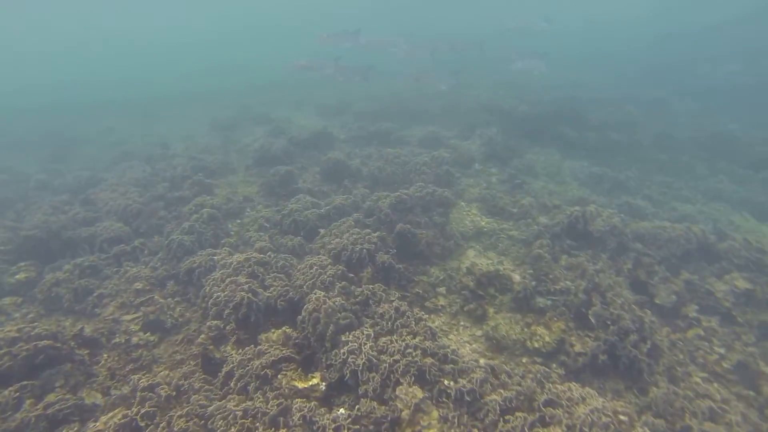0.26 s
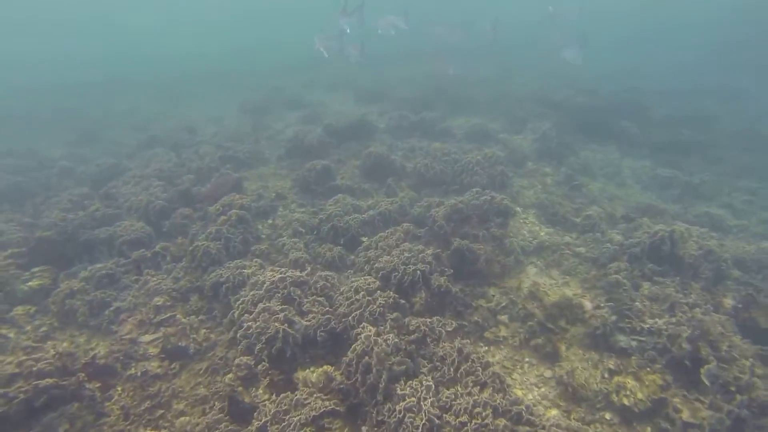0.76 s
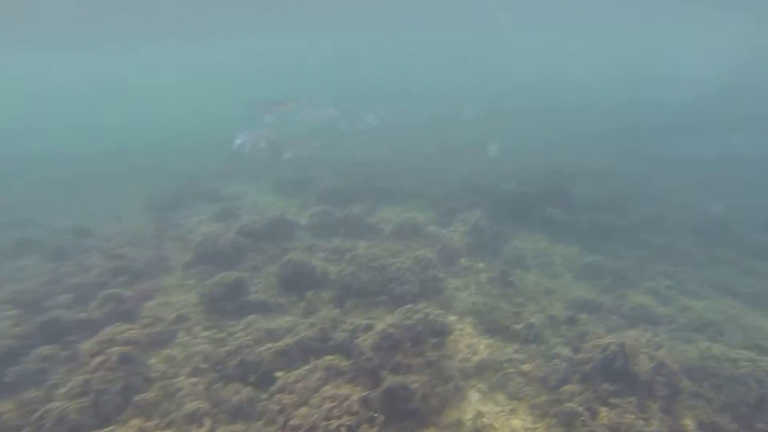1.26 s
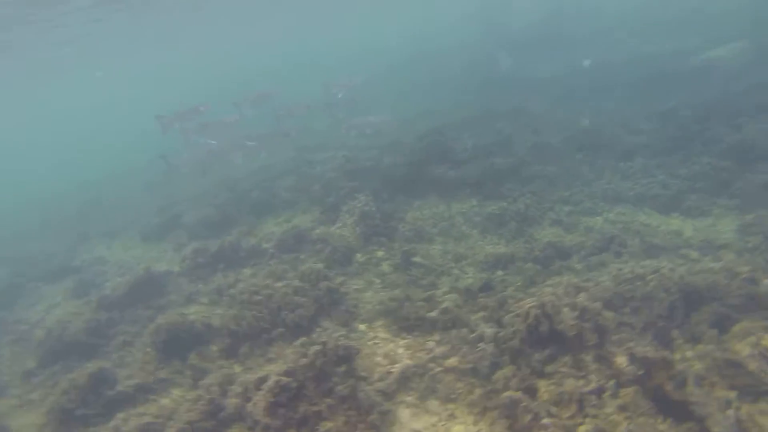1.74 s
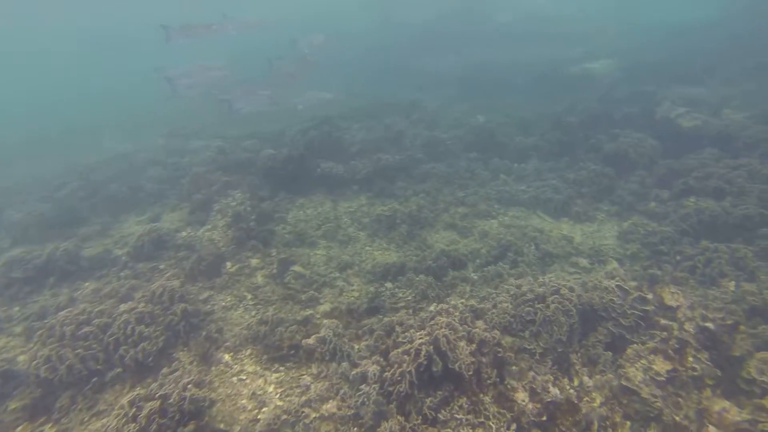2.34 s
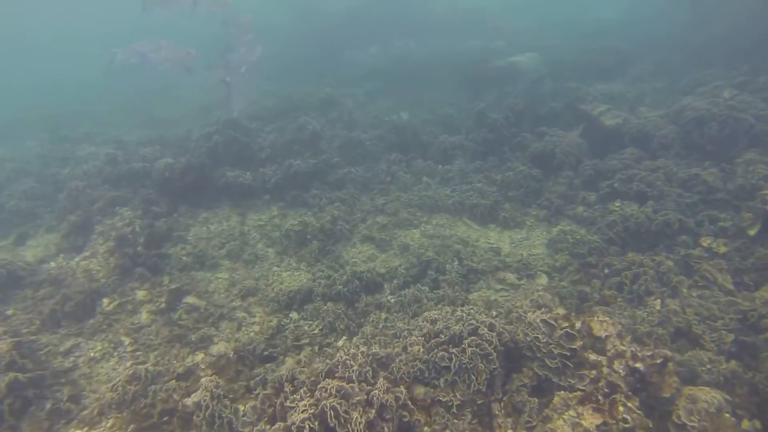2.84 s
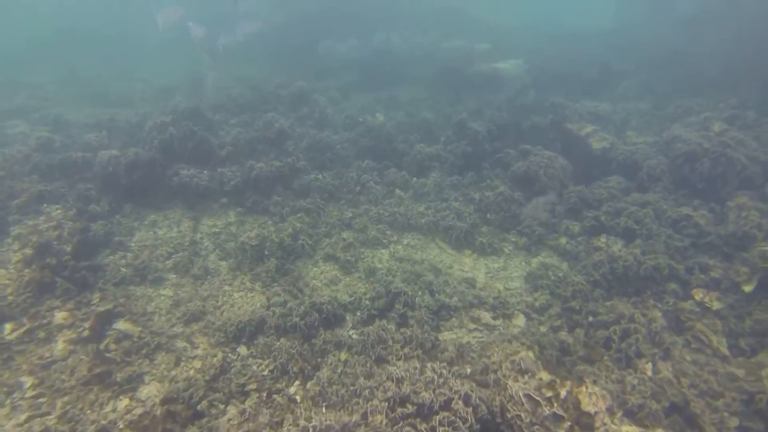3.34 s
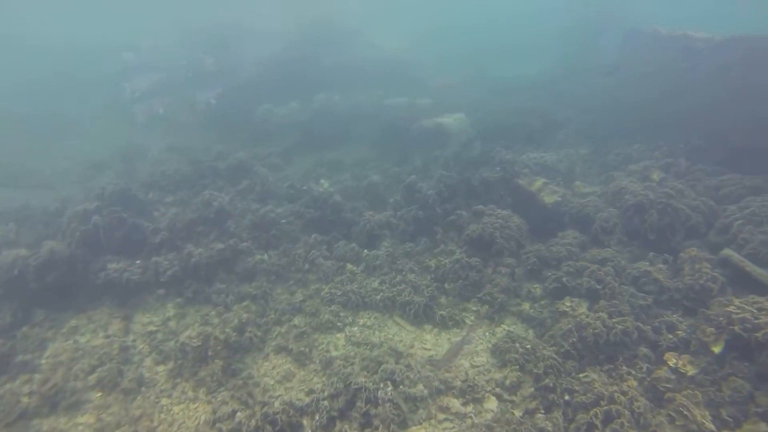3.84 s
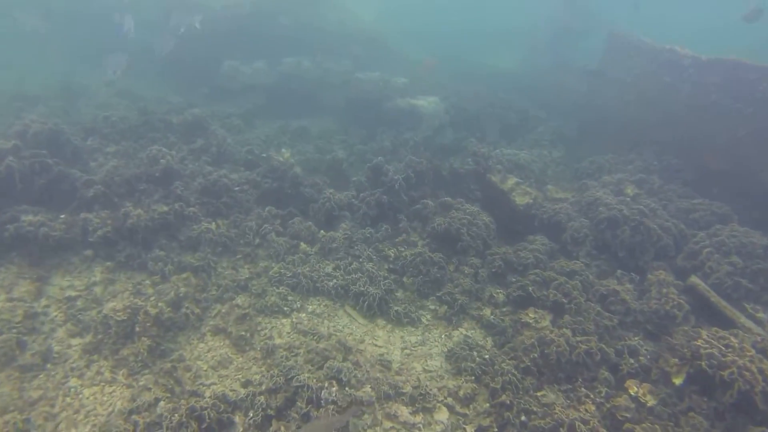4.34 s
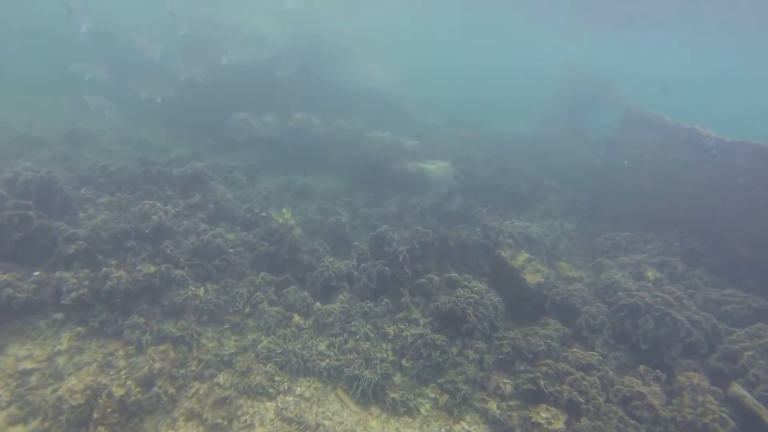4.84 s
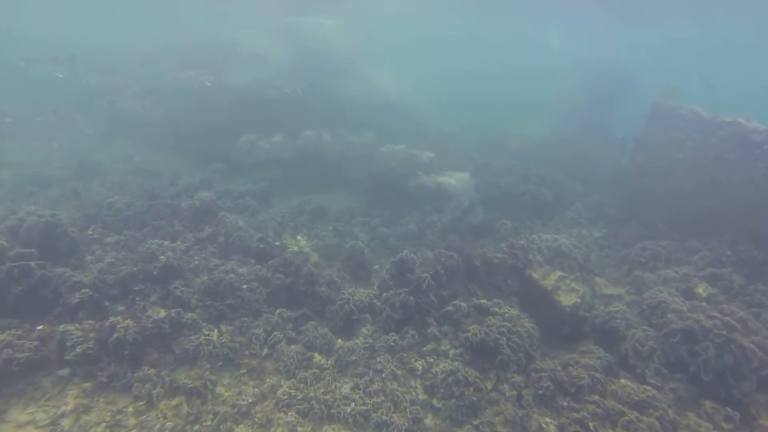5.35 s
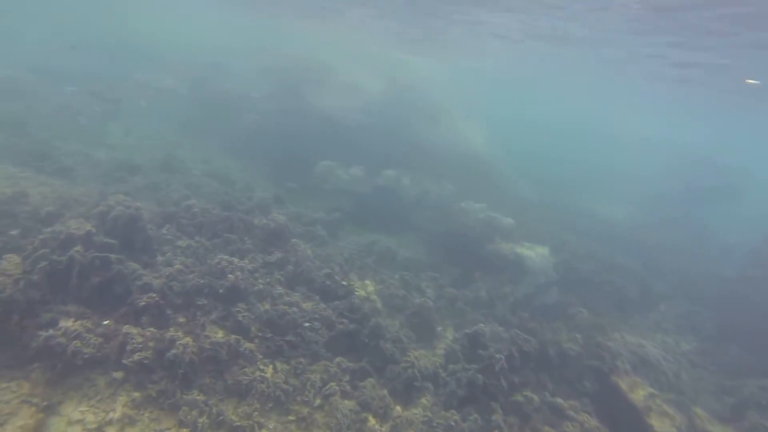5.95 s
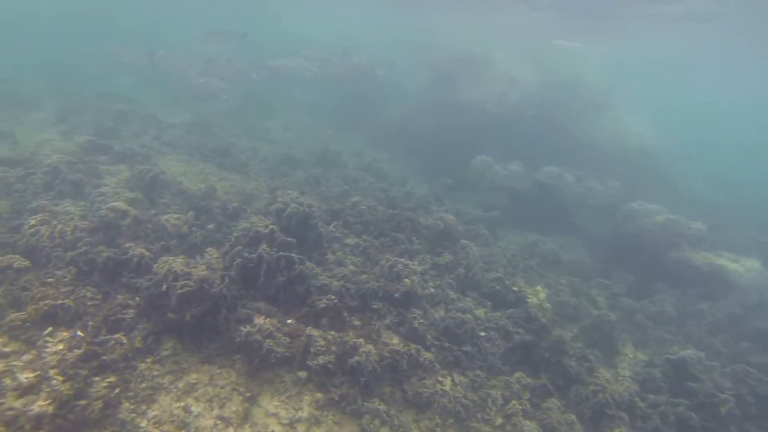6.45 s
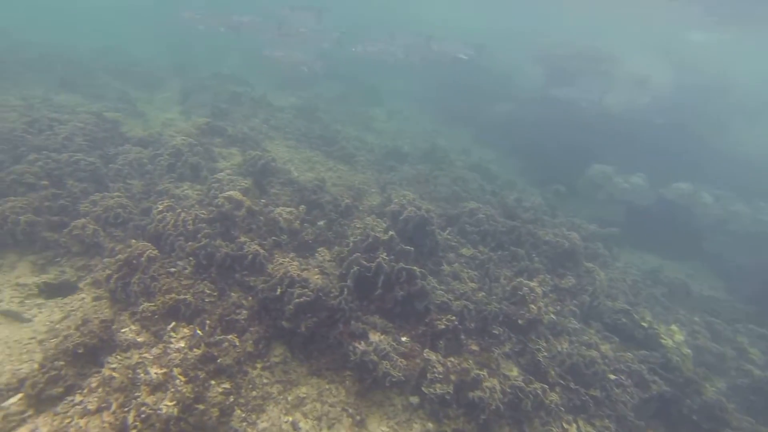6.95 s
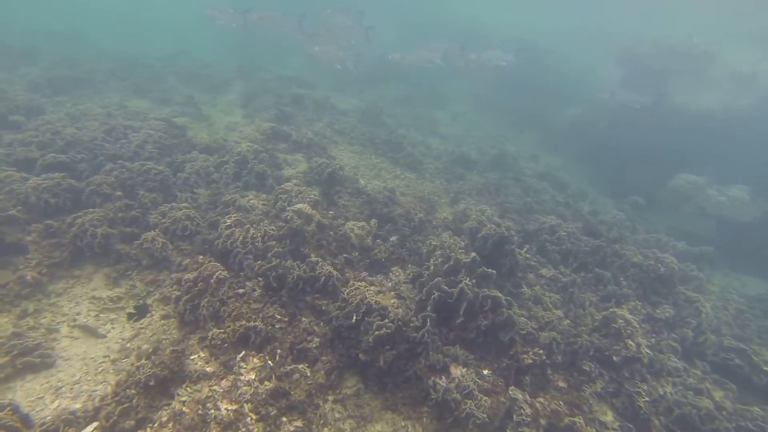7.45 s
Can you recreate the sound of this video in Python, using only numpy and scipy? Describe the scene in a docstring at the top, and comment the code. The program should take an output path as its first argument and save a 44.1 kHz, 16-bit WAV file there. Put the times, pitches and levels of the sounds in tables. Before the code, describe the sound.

Muffled underwater rumble and heavy thumping slaps against a camera housing, then gurgles and constant sharp shrimp snaps crackling over a shallow reef.

```python
"""Just under the surface of a shallow reef, heard by a camera inside a waterproof housing.
From the start: filtered noise for swell and streaming water, and random clicks for the shrimp colony.
Slaps (splash noise and a thump), ringing snaps and foaming surges crowd the first two seconds.
Gurgles and lone bubbles (decaying sines) join in, then two wavering tones at about two seconds.
Slaps are rarer later, and snaps go on to the end; gain control ducks everything after heavy slaps."""
import sys
import numpy as np
from scipy import signal
from scipy.fft import rfft, irfft, next_fast_len
from scipy.io import wavfile
from scipy.ndimage import uniform_filter1d

SR = 44100
rng = np.random.default_rng(int(sys.argv[2]) if len(sys.argv) > 2 else 0)


def dump(signal):
    """Clip the signal to [-1, 1] and save it as 16-bit WAV at the path in sys.argv[1]."""
    limited = np.clip(np.atleast_2d(signal).T, -1, 1)
    pcm = np.round(limited * 32767).astype(np.int16)
    wavfile.write(sys.argv[1], SR, pcm)


N = 339570
TIME = np.arange(N) / SR  # seconds

# Levels in the tables are before the small trims that some functions add.
# Water heaving against the case: t/s, level/dB
SWELL_LEVEL = [(0, -17.5), (0.33, -19), (0.45, -19.5), (0.56, -14.5), (0.95, -17), (1.25, -19),
               (1.7, -13.5), (2.0, -23.5), (2.7, -26.5), (2.95, -16), (3.3, -25), (3.5, -18.5), (3.8, -28),
               (4.1, -26), (4.55, -40.5), (4.8, -19), (5.4, -27.5), (5.7, -23), (6.4, -28.5), (6.7, -24),
               (7.7, -30.5)]
# Water streaming past the case: t/s, level/dB
FLOW_LEVEL = [(0, -44.5), (0.7, -43.5), (1.7, -36), (1.95, -50), (2.2, -54), (2.62, -42.5), (2.9, -44),
              (3.3, -56.5), (3.55, -47), (4.25, -60), (4.85, -48), (5.35, -59.5), (5.75, -49), (6.9, -54),
              (7.7, -54)]
# Far shrimp, all together: t/s, level/dB
COLONY_LEVEL = [(0, -55), (.7, -57), (1.5, -56.5), (2.7, -54.5), (4.2, -55.5), (5.2, -57.5), (6.0, -58.5),
                (7.7, -57)]
# Wavelets hitting the case: t/s, thump level/dB, thump half width/s, splash level/dB
SLAP_EVENTS = [(0.002, -14, 0.0084, -32), (0.15, -14, 0.0071, -30.5), (0.283, 8.5, 0.0025, -35),
               (0.31, 8, 0.0058, -22.5), (0.348, 6.5, 0.005, -32), (0.565, -3.5, 0.0033, -40),
               (0.602, 7.5, 0.003, -18.5), (0.652, -0.5, 0.0063, -55), (0.7989, 0.5, 0.0029, -27),
               (1.098, -1.5, 0.0035, -41), (1.246, -2, 0.0053, -42.5), (1.391, -6.5, 0.0058, -55),
               (1.446, -10, 0.0044, -51), (1.595, 4.5, 0.0015, -26), (1.699, 3, 0.01, -23.5),
               (1.818, -1.5, 0.0058, -36.5), (2.932, -6, 0.006, -40.5), (3.464, -10, .0036, -47.5),
               (4.105, -10.5, 0.0077, -55), (4.806, -14, 0.01, -47), (5.685, -2, 0.0042, -39.5),
               (6.79, -14, 0.0057, -56)]
# The closest shrimp: t/s, knock level/dB, knock pitch f/Hz, crack level/dB
SNAP_EVENTS = [(0.0488, -30, 1830, -44), (0.0975, -41.5, 2430, -44), (0.1385, -41, 1700, -60),
               (0.1465, -29, 1770, -56), (0.2644, -47, 2200, -48), (0.381, -35.5, 3200, -41.5),
               (0.5318, -36, 2100, -41), (0.794, -36, 2660, -53), (1.0954, -46, 2300, -48.5),
               (1.2232, -40.5, 3070, -42.5), (1.302, -42, 2980, -44), (1.2695, -40, 2260, -52),
               (1.3845, -44.5, 3300, -50.5), (1.4463, -42.1, 2570, -51), (1.4862, -32.5, 1620, -53),
               (1.7074, -38, 2430, -43), (1.8362, -37.5, 2220, -56), (1.9644, -51, 2060, -60),
               (2.0923, -34, 1750, -42), (2.1146, -41, 2434, -58), (2.126, -38.5, 2080, -39),
               (2.543, -37.5, 2660, -52), (2.5593, -42, 2570, -46.5), (2.6042, -33.5, 2700, -46),
               (2.6214, -32, 2300, -47), (2.6657, -38, 2390, -57), (2.8533, -35, 1950, -41),
               (2.9093, -33.5, 1700, -45.5), (2.9922, -38.0, 1790, -45.5), (3.0203, -35, 2050, -60),
               (3.1276, -29.5, 2670, -33.5), (3.1783, -35.5, 2470, -47.5), (3.2624, -40.5, 2520, -64),
               (3.3059, -34, 1670, -68), (3.4608, -34.5, 2040, -53), (3.5681, -32.5, 1770, -49),
               (3.587, -36.9, 2440, -46), (3.7315, -36, 2170, -52.2), (3.7948, -60, 2830, -43),
               (3.9727, -38.5, 1760, -48), (4.0466, -32.5, 2320, -67), (4.1104, -39, 2340, -40.5),
               (4.1208, -36, 1530, -54), (4.2376, -37, 2160, -46), (4.2563, -32, 1560, -65.4),
               (4.3813, -33.5, 1970, -50.8), (4.4696, -37.5, 2120, -54), (4.7293, -16.5, 2000, -32.5),
               (5.1334, -39.7, 2700, -50), (5.2556, -42, 2590, -50), (5.2712, -38, 2210, -60),
               (5.4206, -32.5, 3100, -48), (5.6185, -41.5, 2500, -44), (5.8465, -36, 2760, -50),
               (6.77, -43.5, 2300, -62), (6.3483, -33.5, 1770, -63.5), (6.4018, -31, 2150, -39.5),
               (6.4924, -42.5, 2090, -38), (6.595, -31, 2120, -46), (6.6804, -32, 2530, -43.5),
               (6.957, -37, 2300, -56), (6.9649, -35, 2000, -54), (7.0075, -38, 2130, -52),
               (7.2918, -33, 2200, -38.5), (7.319, -40, 2720, -41), (7.3252, -36.5, 2620, -48),
               (7.3369, -33, 1970, -38), (7.3756, -9, 1710, -32.5), (7.495, -38, 2660, -53.5),
               (7.5959, -36.5, 2320, -51)]
# Broken water washing over the case: start t/s, end t/s, start level/dB, end level/dB
SURGE_EVENTS = [(0.121, 0.256, -46, -55), (0.254, 0.355, -36.5, -28), (0.53, 0.646, -43, -29),
                (1.355, 1.555, -56, -45), (0.791, 0.809, -22, -37.5), (1.562, 1.592, -38, -22.5),
                (1.614, 1.7, -33, -31.5), (2.896, 2.95, -43.5, -46.5), (3.42, 3.504, -48, -61)]
# Water pulling away from the case after some of the slaps: t/s, level/dB
PULL_EVENTS = [(0.578, -1), (0.624, 0), (0.818, 8), (1.607, 4.5), (1.713, 10), (5.704, -13)]
# Air pockets breaking up: t/s, level/dB, middle pitch f/Hz, time over which bubbles form/s
GURGLE_EVENTS = [(0.789, -31.5, 1440, 0.016), (1.561, -28, 737, 0.034), (2.133, -41, 600, 0.021),
                 (3.894, -41.5, 597, 0.03), (3.934, -40.5, 366, 0.046), (3.966, -36, 590, 0.015),
                 (4.338, -37, 555, 0.00795), (4.805, -44, 205, 0.043), (4.806, -51, 810, 0.054),
                 (4.901, -44, 400, 0.019), (6.371, -41, 546, 0.019), (7.655, -33, 572, 0.026)]
# Single bubbles: t/s, level/dB, starting pitch f/Hz
BLIP_EVENTS = [(1.542, -38, 590), (3.9, -22.5, 523), (3.991, -26, 206), (4.004, -37, 510),
               (4.278, -40, 462), (4.355, -28, 557), (4.818, -37, 1290), (4.847, -40, 880),
               (4.913, -22, 209), (4.996, -37, 546), (5.574, -40, 536), (5.58, -26, 213)]
# Lower faint tone in the streaming water: t/s, pitch f/Hz, level/dB
LOW_TONE_PATH = [(1.9, 555, -54), (1.97, 565, -51.5), (2.04, 595, -64), (2.18, 602, -52), (2.3, 628, -72),
                 (2.45, 595, -49.5), (2.62, 551, -62)]
# Higher faint tone in the streaming water: t/s, pitch f/Hz, level/dB
HIGH_TONE_PATH = [(2.2, 770, -67), (2.29, 780, -52.5), (2.39, 830, -59), (2.6, 745, -60)]
# Resonances of the housing: f/Hz, width/Hz, boost/dB
HOUSING_RESONANCES = [(565, 61, 6), (1290, 116, 23.5), (1554, 162, 12), (1850, 55, 3), (2260, 210, 8),
                      (2565, 114, 6), (3513, 430, 8.5), (5210, 170, 4.5), (6000, 880, 1.5), (8280, 250, 4),
                      (11400, 400, 4)]
# Spectrum of the swell: f/Hz, relative level/dB (per Hz)
SWELL_SPECTRUM = [(8, -9), (15, 4.5), (24, 8), (35, -4), (50, -10), (70, -16.5), (100, -45.5), (200, -85)]
# Spectrum of the streaming water: f/Hz, relative level/dB (per Hz)
FLOW_SPECTRUM = [(45, -18.5), (75, 5), (120, -1), (160, -6), (210, -6), (290, -10.5), (420, -16.5),
                 (600, -19.5), (1000, -26.5), (3000, -69.5)]
# Spectrum shaping the far shrimp: f/Hz, relative level/dB (per Hz)
COLONY_SPECTRUM = [(250, -5.5), (500, 12), (800, 2), (1050, -10), (1400, -17), (2300, -0.5), (3500, -3),
                   (4500, -8), (7000, -3.5), (9000, -10.5), (12000, -8), (16000, -34)]
# Spectrum of splashes and fizz: f/Hz, relative level/dB (per Hz)
SPLASH_SPECTRUM = [(120, 5), (195, 14), (330, 3), (600, 1.5), (900, -3.5), (1500, -11), (2400, -19),
                   (5000, -30.5), (14000, -59)]
# Spectrum shaping the crack of a snap: f/Hz, relative level/dB (per Hz)
CRACK_SPECTRUM = [(2500, -41.5), (4000, 0.5), (5500, 5), (7500, 2), (10000, -5), (13000, -6), (16000, -19)]
# Spectrum of the surge froth: f/Hz, relative level/dB (per Hz)
SURGE_SPECTRUM = [(150, -30.5), (300, 6), (650, -1), (1000, 3), (1500, -9), (2200, -21), (4000, -23),
                  (12000, -58.5)]


def from_db(db):
    """Turn decibels into a plain multiplier."""
    return 10 ** (np.asarray(db) / 20)


def rms_one(x):
    """Scale a sound to an average strength (RMS) of 1."""
    return x / np.sqrt(np.mean(x ** 2) + 1e-20)


def level(curve):
    """Gain at every sample from rows of (s, dB)."""
    return from_db(np.interp(TIME, *np.transpose(curve)))


def add(out, s, sound):
    """Mix a sound in, starting at s seconds."""
    at = int(np.clip(round(s * SR), 0, N - 1))
    out[at:at + len(sound)] += sound[:N - at]


def bell(x):
    """Bell-shaped bump with height 1 at x = 0."""
    return np.exp(-.5 * np.minimum(x ** 2, 100))


def random_clicks(per_s):
    """True at the samples where a click falls by chance."""
    return rng.random(N) < per_s / SR


def colour(x, spectrum):
    """Filter with the given spectrum that never sounds ahead of its input (minimum phase)."""
    size = 2 * next_fast_len(len(x))
    hz, db = np.transpose(spectrum)
    bins = np.maximum(np.arange(size // 2 + 1) * SR / size, 1)
    gain = from_db(np.interp(np.log(bins), np.log(hz), db))
    # Folding the cepstrum forward in time gives the minimum-phase response.
    cepstrum = irfft(np.log(gain))
    cepstrum[1:size // 2] *= 2
    cepstrum[size // 2 + 1:] = 0
    return irfft(rfft(x, size) * np.exp(rfft(cepstrum)))[:len(x)]


def drift(rate):
    """Random wandering with about `rate` new values a second, joined by straight lines; RMS 1."""
    knots = rng.standard_normal(int(N / SR * rate) + 2)
    return rms_one(np.interp(TIME * rate, np.arange(len(knots)), knots))


def resonance(x, hz, width_hz):
    """Something that rings at one pitch: a two-pole band-pass with gain 1 on top."""
    r = np.exp(-np.pi * width_hz / SR)
    feed = np.array([1, 0, -1]) * (1 - r * r) / 2
    ring = [1, -2 * r * np.cos(2 * np.pi * hz / SR), r * r]
    return signal.lfilter(feed, ring, x + 1e-18)


def double_resonance(x, hz, width_hz):
    """The same resonance twice in a row, for a tighter band."""
    return resonance(resonance(x, hz, width_hz), hz, width_hz)


def housing(x):
    """Each resonance of the case lifts its own band and rings on."""
    for hz, width_hz, boost_db in HOUSING_RESONANCES:
        x = x + (from_db(boost_db) - 1) * resonance(x, hz, width_hz)
    return x


def snap_paths(scatter_db, scatter_t60, tail_db, tail_t60, echo=0.33, echo_gap_s=0.0015,
               echo_loss=0.73, build_s=0.00013, count=3, size=2600):
    """One bubble collapse: direct pulse, early echoes of changing sign, scatter off the coral."""
    t = np.arange(size) / SR
    # Each t60 is the time in seconds to fall by 60 dB.
    decay = from_db(scatter_db - 60 * t / scatter_t60) + from_db(tail_db - 60 * t / tail_t60)
    pulse = rng.standard_normal(size) * decay * (1 - np.exp(-t / build_s))
    pulse[0] += 1
    delays = np.cumsum(echo_gap_s * (.5 + rng.random(count)))
    pulse[(delays * SR).astype(int)] -= echo * (-echo_loss) ** np.arange(count)
    return pulse


def moving_water(swell_db=1.54, flow_db=1.0, eddy_db=3.0, evenness=0.052):
    """Slow pressure swings of the swell, and the rush of eddies shed by the case."""
    heave = colour(rng.standard_normal(N), SWELL_SPECTRUM)
    strength = uniform_filter1d(np.abs(signal.hilbert(heave)), int(.08 * SR))
    heave = rms_one(heave / strength ** evenness)  # evens out the swings a little
    rush = rms_one(colour(rng.standard_normal(N), FLOW_SPECTRUM)) * from_db(eddy_db * drift(30))
    swell = from_db(swell_db) * level(SWELL_LEVEL) * heave
    return swell + from_db(flow_db) * level(FLOW_LEVEL) * rush


def far_shrimp(per_s=300, spread_db=5.5, crackle_db=3.5, wash_db=-0.5, route_width=0.37, count=24):
    """Many weak snaps of uneven size; the farthest merge into a smooth sizzle."""
    sizes = from_db(spread_db * np.minimum(rng.exponential(1, N), 3.2))
    clicks = random_clicks(per_s) * sizes * rng.choice([-1, 1], N)
    route = rng.integers(0, count, N)
    crackle = np.zeros(N)
    # Each route over the coral favours a band of its own.
    for k, hz in enumerate(np.geomspace(1300, 5000, count)):
        paths = snap_paths(scatter_db=-5.0, scatter_t60=0.0092, tail_db=-24.5, tail_t60=0.031)
        path = resonance(paths, hz, route_width * hz)
        crackle += signal.oaconvolve(clicks * (route == k), rms_one(path))[:N]
    reef = rms_one(crackle) + from_db(wash_db) * rng.standard_normal(N)
    sizzle = rms_one(colour(housing(reef), COLONY_SPECTRUM))
    return from_db(crackle_db) * level(COLONY_LEVEL) * sizzle


def small_shrimp(per_s=70, tick_db=-35, spread_db=8.0, width=0.51, fade_db=1.5, count=7):
    """Tiny shrimp close by give only thin ticks, dealt out over several pitches."""
    sizes = from_db(tick_db + spread_db * np.clip(rng.standard_normal(N), -2, 2))
    clicks = random_clicks(per_s) * sizes
    dealt = rng.integers(0, count, N)
    ticks = np.zeros(N)
    for k, hz in enumerate(np.geomspace(3200, 11000, count)):
        path = snap_paths(scatter_db=-11.5, scatter_t60=0.016, tail_db=-60, tail_t60=.03)
        tick = double_resonance(path, hz, width * hz)
        # Higher ticks are fainter.
        ticks += from_db(-fade_db * k) * signal.oaconvolve(clicks * (dealt == k), tick)[:N]
    return ticks * rms_one(level(COLONY_LEVEL))  # they rise and fall with the colony


def froth(spectrum, gain_db):
    """The lumpy, sputtering rush of torn water: noise whose strength flickers."""
    sputter = from_db(5 * drift(330))
    return from_db(gain_db) * rms_one(colour(rng.standard_normal(N) * sputter, spectrum))


def case_boom(thumps, boom_hz=185, boom_width_hz=70, boom_db=0,
              rebound_hz=42, rebound_width_hz=28, rebound_db=-4):
    """A slap rocks the whole case, which swings back and booms briefly."""
    rebound = from_db(rebound_db) * resonance(thumps, rebound_hz, rebound_width_hz)
    boom = from_db(boom_db) * resonance(thumps, boom_hz, boom_width_hz)
    return thumps + rebound + boom


def slaps(rise_s=0.0056, fall_s=0.015, lead_s=0.0083, foam_db=-16, foam_s=0.041, suction_widths=3.3):
    """A splash swells up, then water closes on the case: a pressure peak flanked by suction."""
    thumps, splash = np.zeros(N), np.zeros(N)
    for s, db, width, splash_db in SLAP_EVENTS:
        near = slice(*np.searchsorted(TIME, [s - .2, s + .2]))
        t = TIME[near] - s
        peak = 1 / (1 + (t / width) ** 2)
        peak -= peak.min()
        suction = bell(t / (suction_widths * width) - .7)
        # The suction cancels the total push of the peak.
        thumps[near] += from_db(db) * (peak - suction * peak.sum() / suction.sum())
        early = t + lead_s  # the splash is strongest just before the thump
        swelling = bell(early / np.where(early < 0, rise_s, fall_s))
        foam = from_db(foam_db) * np.exp(-np.abs(t) / foam_s)
        splash[near] += from_db(splash_db) * (swelling + foam)
    return case_boom(thumps) + splash * froth(SPLASH_SPECTRUM, gain_db=3.5)


def neighbours(per_s=42, top_db=-41.5, range_db=15, flurry_db=3.5, middle_hz=2300,
               spread_octaves=0.5, crack_db=-11, crack_spread_db=8):
    """Random snaps a little farther off, in flurries, more often where the colony is loud."""
    chance, place, pitch, edge = rng.random((int(per_s * N / SR), 4)).T
    activity = np.cumsum((level(COLONY_LEVEL) * from_db(flurry_db * drift(18))) ** 2)
    s = np.interp(chance, activity / activity[-1], TIME)
    db = top_db - range_db * np.sqrt(place)  # most are far off and weak
    hz = middle_hz * 2 ** (spread_octaves * (2 * pitch - 1))
    crack = db + crack_db + crack_spread_db * (2 * edge - 1)
    return np.transpose([s, db, hz, crack])  # same columns as SNAP_EVENTS


def at_level(snap, db):
    """Scale a snap to a level over its first 8 ms."""
    head = snap[:int(.008 * SR)]
    return snap * from_db(db) / np.sqrt(np.mean(head ** 2))


def near_shrimp(knock_width_hz=1450, crack_trim_db=-4.5, thud_hz=760, thud_width_hz=700,
                thud_db=-1.0, thud_growth=1.215, scatter_db=-21.0, clearing=0.1):
    """A snap knocks the housing with a thin crack on top; closer ones thud more, scatter less."""
    out = np.zeros(N)
    for s, db, hz, crack_db in [*SNAP_EVENTS, *neighbours()]:
        scatter = scatter_db - clearing * db + rng.normal(0, 2.8)
        pulse = housing(snap_paths(scatter, scatter_t60=0.019, tail_db=-39, tail_t60=0.017))
        knock = double_resonance(pulse, hz, knock_width_hz)
        thud = double_resonance(pulse, thud_hz, thud_width_hz)
        sharp = snap_paths(scatter_db=-9.5, scatter_t60=0.0063, tail_db=-56, tail_t60=0.15)
        crack = colour(housing(sharp), CRACK_SPECTRUM)
        snap = at_level(knock, db)
        snap += at_level(thud, thud_growth * db + thud_db)
        snap += at_level(crack, crack_db + crack_trim_db)
        add(out, s, snap)
    return out


def surges(attack_s=0.0025, release_s=0.0053, bubbles_per_s=260, bubble_db=-2,
           bubble_width=0.05, count=22):
    """Broken water sets in quickly and washes on: froth full of small ringing bubbles."""
    flow = np.zeros(N)
    for start, end, start_db, end_db in SURGE_EVENTS:
        fade_in = np.clip((TIME - start) / attack_s, 0, 1)
        fade_out = np.exp(-np.clip((TIME - end) / release_s, 0, 20))
        flow += fade_in * fade_out * level([(start, start_db), (end, end_db)])
    births = random_clicks(bubbles_per_s) * rng.standard_normal(N)
    dealt = rng.integers(0, count, N)
    bubbles = np.zeros(N)
    for k, hz in enumerate(np.geomspace(500, 1900, count)):
        bubbles += resonance(births * (dealt == k), hz, bubble_width * hz) / hz
    return flow * (froth(SURGE_SPECTRUM, gain_db=-11.5) + from_db(bubble_db) * rms_one(bubbles))


def pulls(width_s=0.0064):
    """A slow, strong suction: little of it is heard, but it can trip the gain control."""
    return -sum(from_db(db) * bell((TIME - s) / width_s) for s, db in PULL_EVENTS)


def gurgles(per_s=300, spread_octaves=0.16, cycles=12, rise=0.0083, gurgle_db=-4.0, fizz_db=-7,
            rough_db=-34, calming=0.49):
    """A pocket splits into bubbles of similar size; each rings briefly and rises in pitch."""
    out = np.zeros(N)
    for s, db, hz, length in GURGLE_EVENTS:
        t = np.arange(int((length + 0.053) * SR)) / SR
        # One row per bubble, one column per sample.
        born, size, strength = rng.random((int(per_s * length) + 1, 3)).T[:, :, None]
        calm = from_db(calming * (rough_db - db))  # gentle gurgles are purer and ring longer
        pitch = hz * 2 ** (spread_octaves / calm * (2 * size - 1))
        turns = np.maximum(t - born * length, 0) * pitch
        life = turns / (cycles * calm)
        envelope = strength * from_db(-60 * life) * (1 - np.exp(-2 * turns))
        cloud = np.sum(envelope * np.sin(2 * np.pi * turns * (1 + rise * life)), axis=0)
        # Torn water fizzes along.
        fizz = rms_one(colour(rng.standard_normal(len(t)), SPLASH_SPECTRUM))
        cloud += from_db(fizz_db) / calm * np.abs(cloud) * fizz
        add(out, s, from_db(db + gurgle_db) * cloud / np.sqrt(np.sum(cloud ** 2) / (length * SR)))
    return out


def blips(t60=0.041, turn_gain_per_s=1.7):
    """A lone bubble pinches off, rings and rises in pitch."""
    out, t = np.zeros(N), np.arange(SR // 10) / SR
    for s, db, hz in BLIP_EVENTS:
        turns = hz * t * (1 + turn_gain_per_s * t)
        envelope = from_db(db - 60 * t / t60) * (1 - np.exp(-turns))
        add(out, s, envelope * np.sin(2 * np.pi * turns))
    return out


def wavering_tones(tone_db=-2, fade_s=0.036, waver=0.035, flutter_db=4.5):
    """Each tone glides, trembles in pitch (waver is a share of it) and level, and fades in and out."""
    out = np.zeros(N)
    for tone in (LOW_TONE_PATH, HIGH_TONE_PATH):
        s, hz, db = np.transpose(tone)
        pitch = np.interp(TIME, s, hz) * (1 + waver * drift(120))
        outside = np.abs(TIME - np.clip(TIME, s[0], s[-1]))  # seconds before or after the tone
        fade = np.exp(-np.minimum(outside / fade_s, 20))
        gain = from_db(np.interp(TIME, s, db) + tone_db + flutter_db * drift(50)) * fade
        out += gain * np.sin(2 * np.pi * np.cumsum(pitch) / SR)
    return out


def gain_control(x, threshold_db=-9, sense_s=0.00099, attack_s=0.0015, release_db_per_s=68):
    """Gain drops fast when the level passes the threshold and creeps back."""
    # Averaging before taking the size makes it respond to slow pushes more than to brief snaps.
    loud = np.abs(uniform_filter1d(x, max(int(sense_s * SR), 1)))
    over = np.maximum(20 * np.log10(np.maximum(loud, 1e-9)) - threshold_db, 0)
    recovery = release_db_per_s * TIME
    held = np.maximum.accumulate(over + recovery, axis=-1) - recovery
    r = np.exp(-1 / (attack_s * SR))
    return x * from_db(-signal.lfilter([1 - r], [1, -r], held))


def scene():
    """All sources reach one microphone inside the case."""
    water = moving_water() + slaps() + surges() + pulls() + gurgles() + blips() + wavering_tones()
    shrimp = far_shrimp() + small_shrimp() + near_shrimp()
    return (water + shrimp)[None]


def record(dry, cutoff_hz=16100):
    """Gain control acts, peaks are clipped, and the top is cut by 60 dB from the cutoff up."""
    clipped = np.clip(gain_control(dry), -.95, .95)
    top_cut = signal.cheby2(12, 60, cutoff_hz, fs=SR, output="sos")
    return signal.sosfilt(top_cut, clipped)


dry = scene()
out = record(dry)
dump(out)
```